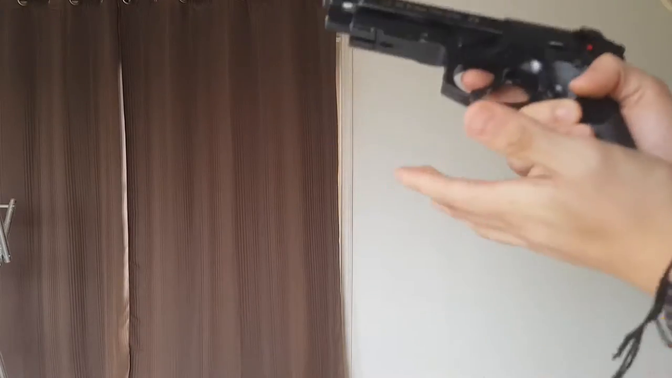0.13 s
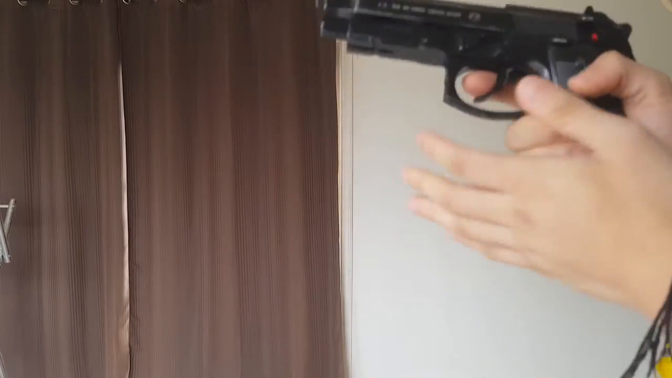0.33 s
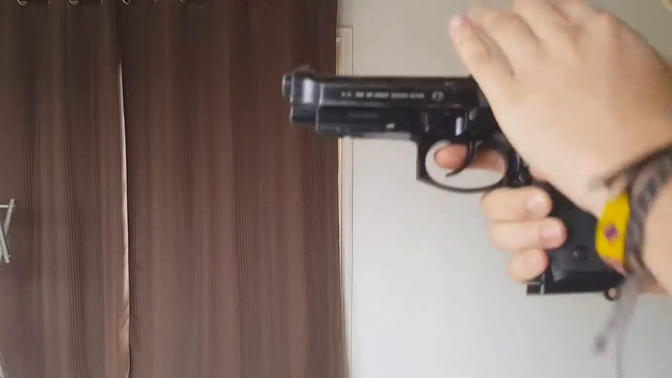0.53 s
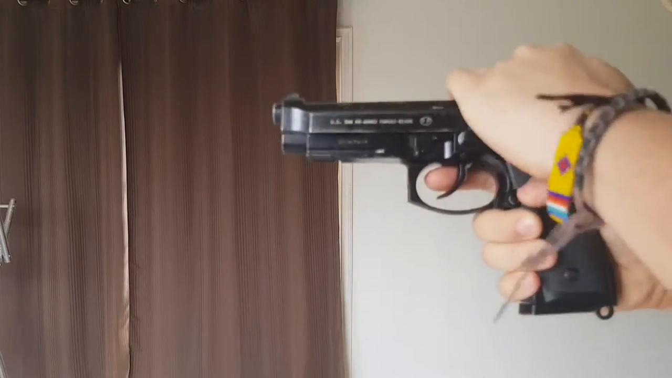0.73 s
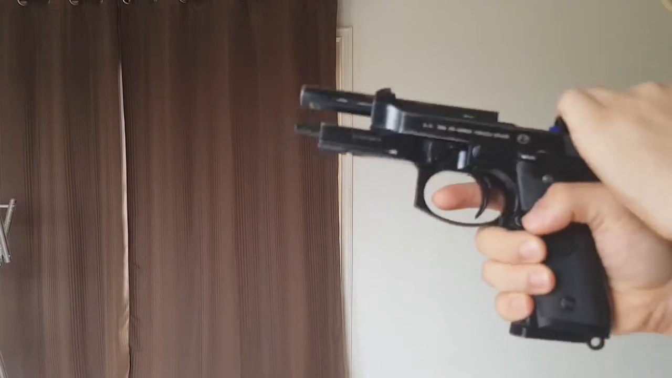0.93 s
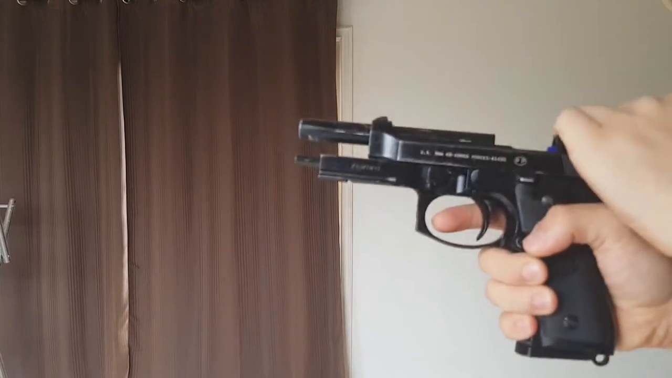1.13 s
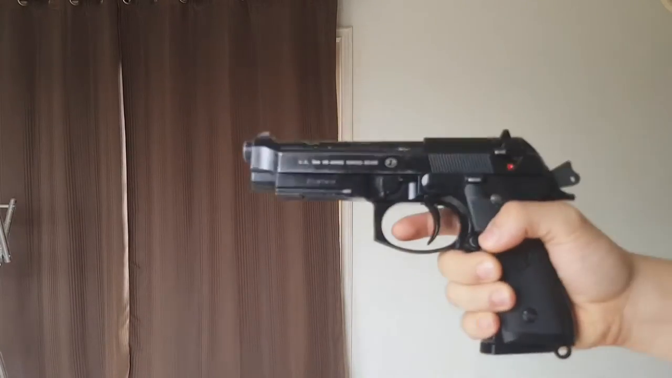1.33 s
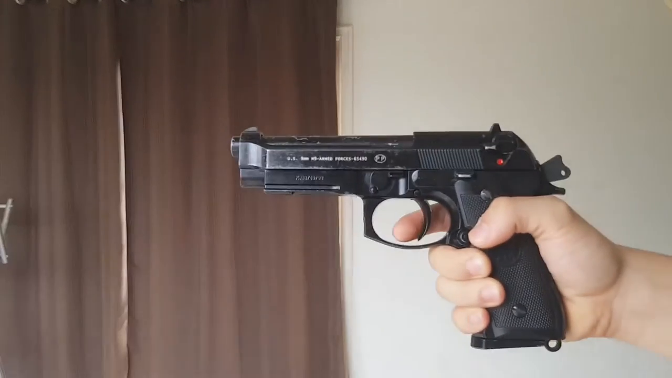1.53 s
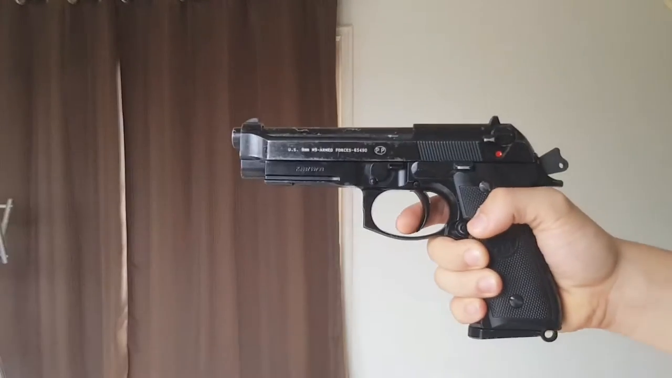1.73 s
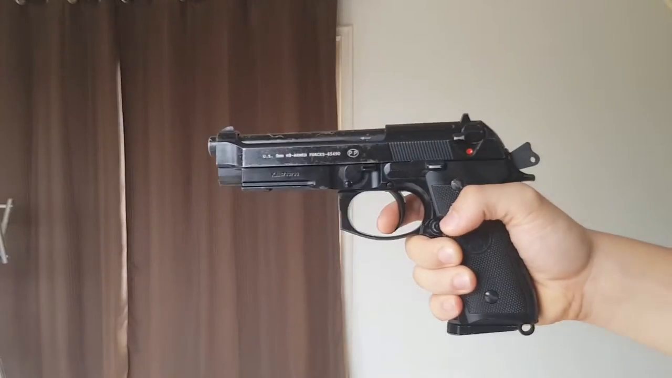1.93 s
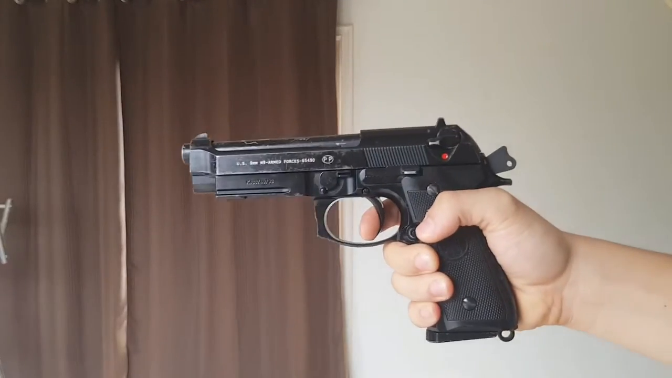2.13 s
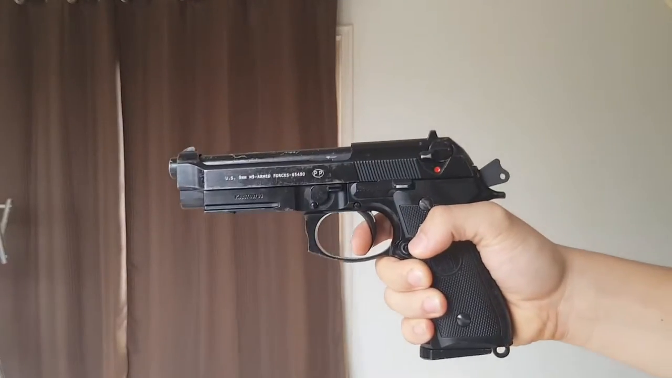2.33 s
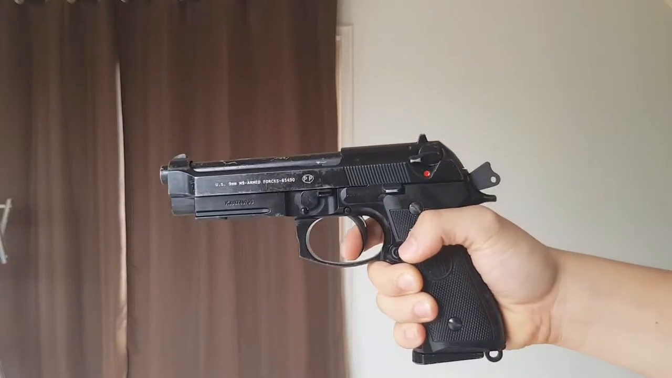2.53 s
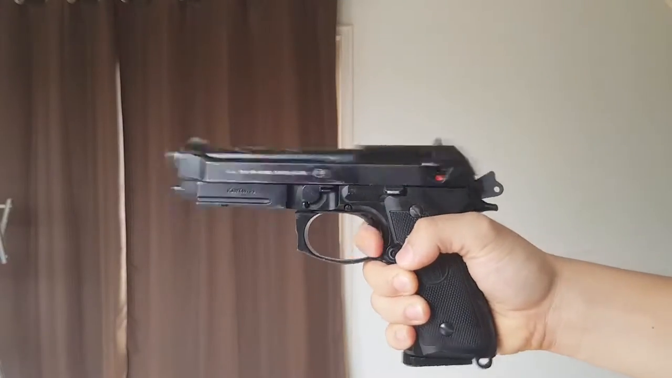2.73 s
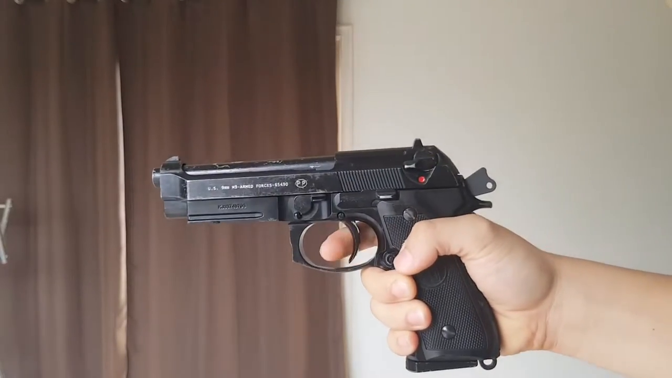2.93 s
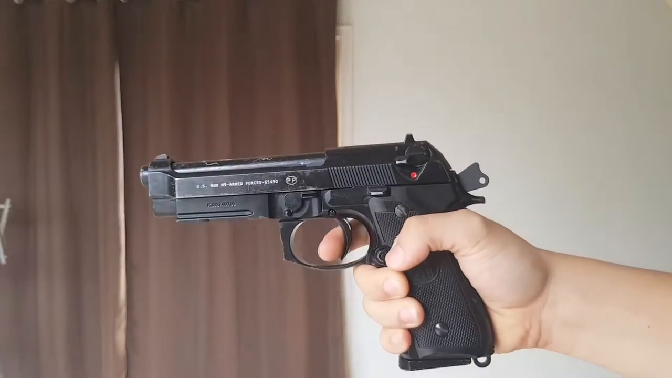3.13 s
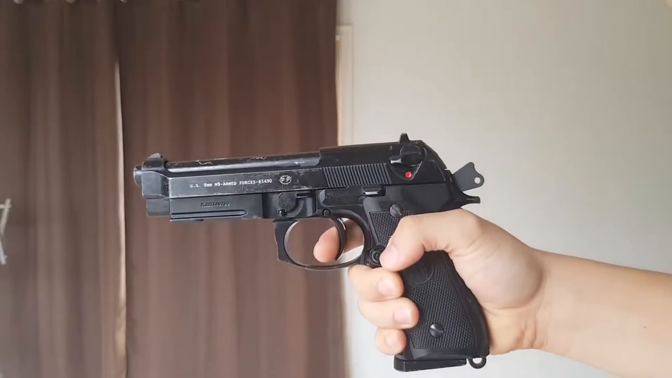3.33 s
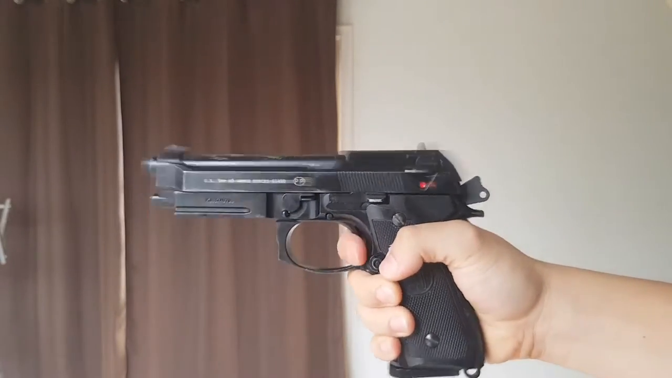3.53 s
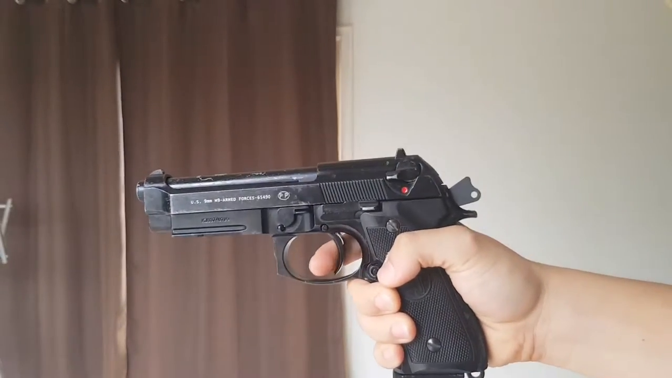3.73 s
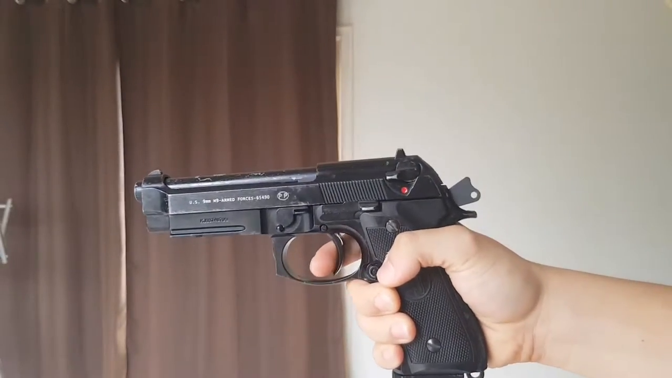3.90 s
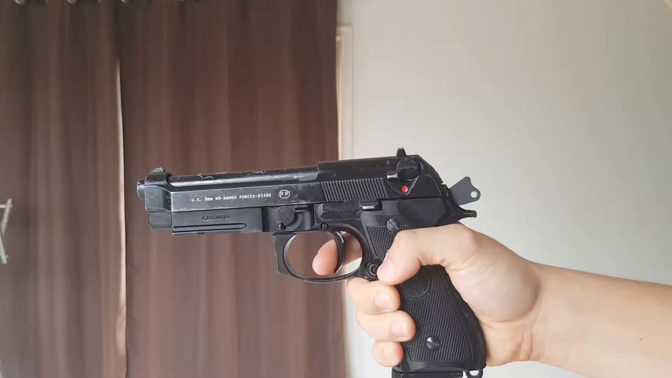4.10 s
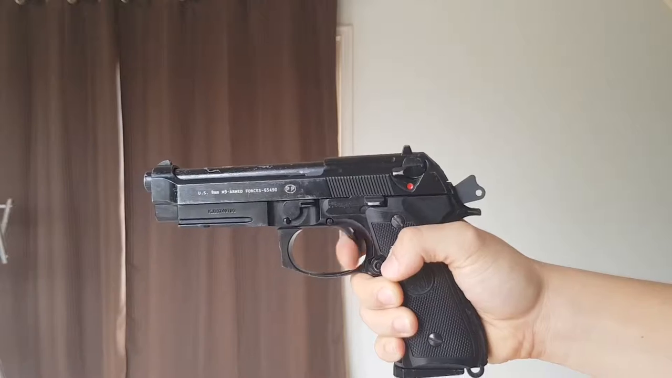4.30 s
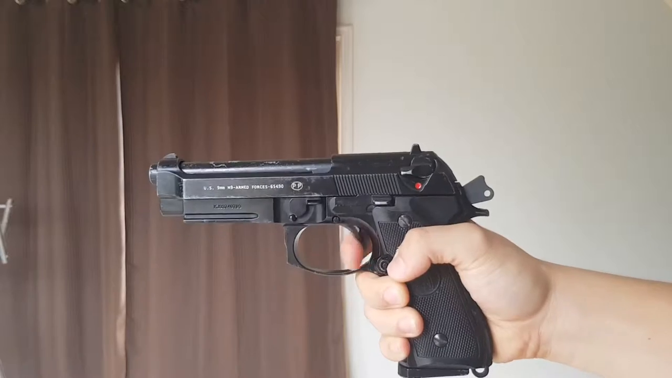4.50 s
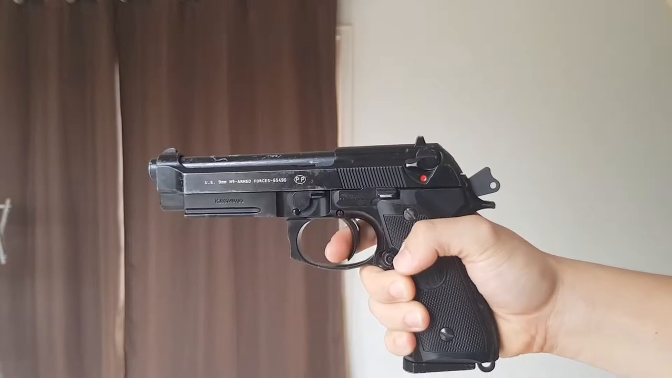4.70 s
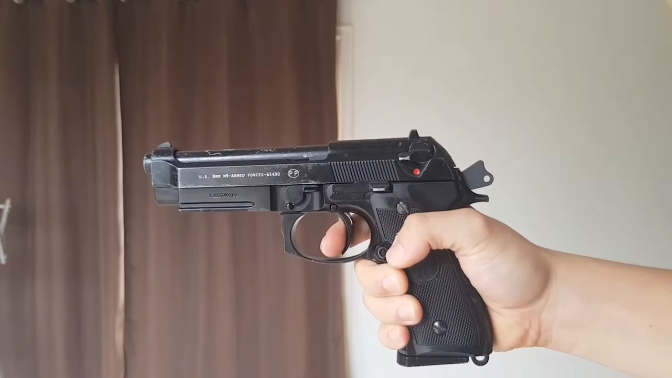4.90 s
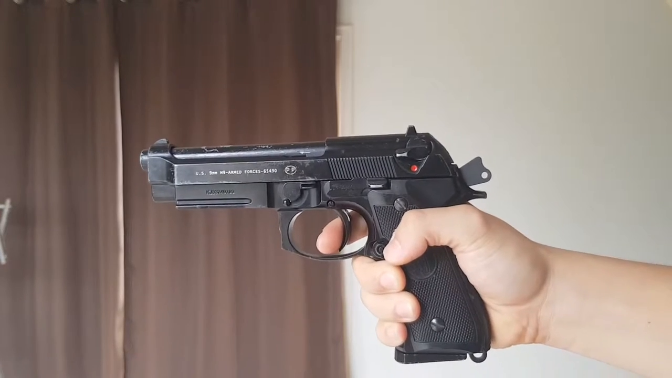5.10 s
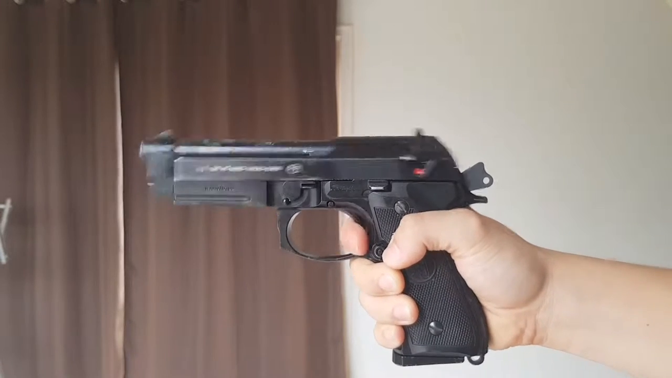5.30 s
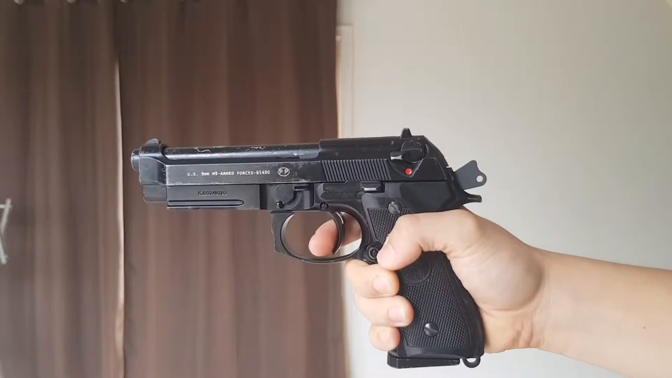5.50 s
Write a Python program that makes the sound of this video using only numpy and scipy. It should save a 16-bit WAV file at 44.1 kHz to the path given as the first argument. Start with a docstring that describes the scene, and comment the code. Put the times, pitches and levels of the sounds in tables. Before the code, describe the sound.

A fan hums low and steady in a small bare room. Right at the start, a magazine is slapped into a gas airsoft pistol close by, with a sharp double clack. From about 0.8 to 0.9 seconds the slide is drawn back with small clicks and a scrape, and at 1.3 seconds it slams shut with a bright metallic clack. A faint trigger click leads into four shots, at about 2.75, 3.55, 4.4 and 5.3 seconds. Each is a sharp gas pop merged with the slide clacking back and forth, a slight steel ring and a pellet smacking a target across the room, followed by a short echo. Puffs of air thump the microphone, mostly on the first three shots. A tiny ringing click comes near 3.3 seconds. The overall level drops at the first shot, leaving the hum fainter afterwards.

```python
"""A fan hums in a small bare room. A magazine is slapped into a gas airsoft pistol, then the slide
(the moving top) is pulled back and let go. Four shots follow, from 2.75 s on. In each, the hammer
knocks a valve open, gas pops out, the slide flies back and home, and the pellet smacks a target
across the room. The camera's gain control turns everything down at the first shot and keeps it low."""
import sys
import numpy as np
from scipy import signal
from scipy.fft import rfft, irfft, next_fast_len
from scipy.io import wavfile
from scipy.ndimage import uniform_filter1d, map_coordinates

SR = 44100
rng = np.random.default_rng(int(sys.argv[2]) if len(sys.argv) > 2 else 0)


def wrap_up_sound(samples):
    """Save the sound to the file named by the first command line argument, as 16-bit audio."""
    columns = np.atleast_2d(samples).T
    # keep every value between -1 and 1, then stretch to whole-number steps
    tamed = np.clip(columns, -1, 1)
    steps = np.round(tamed * 32767).astype(np.int16)
    wavfile.write(sys.argv[1], SR, steps)


N = 244755


def amp(db):
    """Turn decibels into a multiplier."""
    return 10 ** (np.asarray(db) / 20)

def unit(x):
    """Scale to an average power of one."""
    return x / np.sqrt(np.mean(x ** 2) + 1e-20)

def along(points, hz):
    """Read between (pitch, value) points on a log scale."""
    pitches, values = np.transpose(points)
    return np.interp(np.log(hz + 1), np.log(pitches + 1), values)

def add(track, s, sound):
    """Mix a sound into a track at s seconds."""
    part = track[..., max(0, round(s * SR)):][..., :sound.shape[-1]]
    part += sound[..., :part.shape[-1]]

def wobble(rate):
    """A smooth curve through `rate` random points a second."""
    return map_coordinates(rng.standard_normal(int(N * rate / SR) + 4), [np.arange(N) * rate / SR])

def filtered(x, response):
    """Scale each frequency in x by response(hz)."""
    n = x.shape[-1]
    padded = next_fast_len(n + n // 8)
    return irfft(rfft(x, padded) * response(np.fft.rfftfreq(padded, 1 / SR)), padded)[..., :n]

def coloured(x, tone, size=4096):
    """Give x a tone colour that would leave white noise just as strong."""
    gains = unit(amp(along(tone, np.fft.rfftfreq(size, 1 / SR))))
    cepstrum = irfft(np.log(gains))
    cepstrum[1:size // 2] *= 2
    cepstrum[size // 2 + 1:] = 0  # so nothing sounds before its hit
    return signal.fftconvolve(x, irfft(np.exp(rfft(cepstrum)))[None], axes=1)[:, :N]

def stereo_noise(likeness, count):
    """White noise whose left and right are alike (1), unrelated (0) or opposite (-1)."""
    def shares(hz):
        turn = np.arccos(np.clip(along(likeness, hz), -1, 1)) / 2
        return np.array([np.cos(turn), np.sin(turn)])
    mid, side = filtered(rng.standard_normal((2, count)), shares)
    return np.array([mid + side, mid - side])

# sound arriving from all sides: (pitch [Hz], left-right likeness [-1 to 1])
ALL_AROUND = [(60, 0.92), (130, 0.96), (290, .75), (640, 0.46), (1400, -0.51), (3000, 0.54), (7000, -0.15)]
# the fan motor's tones: (pitch [Hz], level [dB])
FAN_HUM = [(67, -53.5), (96, -55), (174.5, -47), (269, -68.5), (431, -78)]
# tone of the moving air: (pitch [Hz], level [dB])
FAN_AIR = [(20, -31.5), (40, -5.5), (65, -1), (100, 4), (140, 0), (190, -3), (250, -14.5), (400, -20),
           (700, -26), (1300, -29.5), (2500, -46.5), (4000, -59), (15000, -58)]
def fan(air_db=-47, waver_db=3.14):
    """A motor hums, a little unsteadily, over a low rush of air."""
    t = np.arange(N) / SR
    hum = 0
    for hz, db in FAN_HUM:
        strength = amp(db + waver_db * wobble(5.3))
        hum += strength * unit(np.sin(2 * np.pi * hz * t + 0.53 * wobble(2.9)))
    air = unit(filtered(stereo_noise(ALL_AROUND, N), lambda hz: amp(along(FAN_AIR, hz))))
    return hum + amp(air_db) * air

# the room's echo: (pitch [Hz], fade time [s]); a fade time, or t60, is the time to drop 60 dB
ROOM_FADE = [(60, 0.32), (130, 0.88), (400, 0.66), (1400, 0.74), (2700, 0.73), (5400, 0.6), (7700, 0.6),
             (11000, 0.47), (16000, 0.39)]
def room(x, gap_s=0.0014, build_s=0.00077, late_db=-24, late_stretch=2.26, count=6):
    """The walls answer after a short gap; highs fade before mids, and a faint echo lingers."""
    paths = np.array([wobble(100) for _ in range(count)])
    paths /= np.linalg.norm(paths, axis=0)  # each hit takes its own mix of paths round the room
    swell = 1 - np.exp(-np.maximum(np.arange(SR) / SR - gap_s, 0) / build_s)
    echo = np.zeros((2, N))
    for share in paths:
        hz, t, bands = signal.stft(stereo_noise(ALL_AROUND, SR), SR, nperseg=256)
        fall_db = -60 * t / along(ROOM_FADE, hz)[:, None]
        fade = np.hypot(amp(fall_db), amp(late_db + fall_db / late_stretch))
        tail = swell * signal.istft(bands * fade, SR, nperseg=256)[1][:, :SR]
        echo += signal.fftconvolve(share * x, tail / np.linalg.norm(tail[0]), axes=1)[:, :N]
    return echo

# air hitting the microphones: (time [s], left level [dB], right level [dB], length [s])
AIR_PUFFS = [(0.0, -34.5, -25.5, .03), (1.301, -35, -28, 0.025), (2.7532, 1.5, -1.5, 0.022),
             (3.555, 8.5, -31, .028), (4.4077, 4.5, -27, 0.016), (5.288, -20.5, -16.5, 0.015)]
def air_puffs(swing_hz=49, kick_turns=0.63, kick_s=0.0015):
    """A push of air kicks each microphone, which swings fast, then slows to a low thump."""
    thumps, t = np.zeros((2, N)), np.arange(SR // 4) / SR
    swing = np.sin(2 * np.pi * (swing_hz * t + kick_turns * (1 - np.exp(-t / kick_s))))
    for s, left_db, right_db, length in AIR_PUFFS:
        add(thumps, s, -amp([[left_db], [right_db]]) * swing * np.exp(-(t / length) ** 2))
    return thumps

# sound straight from the pistol: (pitch [Hz], left-right likeness [-1 to 1])
STRAIGHT = [(300, 1), (2000, 0.48), (6000, 0), (12000, 0)]
def burst(t60, rise_s=0.000062, count=8192):
    """One hit: noise that starts fast and dies away."""
    t = np.arange(count) / SR
    return stereo_noise(STRAIGHT, count) * amp(-60 * t / t60) * (1 - np.exp(-t / rise_s))

def rattle(t60, grain_db=3.0, grain_s=.0004, count=8192):
    """Loose parts chatter: a dying burst broken into tiny hits."""
    points = rng.standard_normal(count)
    grains = np.interp(np.arange(count) / SR / grain_s, np.arange(count), points)
    return burst(t60, count=count) * unit(amp(grain_db * grains))

# light touches on slide and trigger: (time [s], steel level [dB], fade time [s], frame level [dB])
CLICKS = [(.7935, -45.5, 0.0079, -51), (.8415, -40, 0.0076, -45.5), (.938, -43.5, 0.022, -32),
          (2.69, -38.5, 0.021, -49.5), (3.277, -37, 0.13, -57), (4.222, -61, 0.019, -46.5)]
# parts sliding under the hand: (start [s], end [s], steel level [dB], frame level [dB])
SCRAPES = [(0.814, 0.853, -54.5, -51.5), (0.864, .908, -35, -42.5), (1.256, 1.279, -53.5, -53.5),
           (2.706, 2.729, -56, -58.5)]
def light_touches(scatter_db=2, slip_t60=0.027, count=5):
    """List the clicks, and the uneven ticks of parts that catch and slip as they slide."""
    ticks = []
    for start, end, steel_db, frame_db in SCRAPES:
        times = start + (end - start) * (np.arange(count) + .5 * rng.random(count)) / count
        forces_db = scatter_db * rng.standard_normal(count)
        ticks += [(s, steel_db + db, slip_t60, frame_db + db) for s, db in zip(times, forces_db)]
    return CLICKS + ticks

# The magazine goes in and latches; the slide cocks the hammer, hits its stop, picks up a pellet
# and slams shut; the barrel settles:
# (time [s], steel level [dB], fade time [s], ring compared with steel [dB], frame level [dB])
LOADING_BLOWS = [(0.0, -13, 0.052, -35.5, -21), (.019, -14.5, 0.12, -27.5, -19.5),
                 (0.8601, -18.5, .011, -29.5, -35.5), (0.9149, -18, .02, -36.5, -27),
                 (1.281, -20.5, 0.06, -32, -43), (1.2956, -10, 0.058, -25, -21),
                 (1.3152, -14.5, 0.036, -27, -29)]
def loading_hits(bounce_share=.15, bounce_db=-1.5):
    """List the hits of loading: each part strikes and bounces once, the looser the later."""
    hits = []
    for s, db, t60, ring_db, _ in LOADING_BLOWS:
        hits += [(s, db, t60, ring_db), (s + bounce_share * t60, db + bounce_db, t60, ring_db)]
    return hits

# tone of the plastic frame: (pitch [Hz], level [dB])
FRAME_TONE = [(150, -19), (400, -8.5), (560, -3), (780, -6.5), (1050, 1), (1500, -3), (2250, 6), (3200, -4),
              (8000, -16), (15000, -30.5)]
def frame_knocks(touches, knock_t60=0.02):
    """The plastic frame answers each loading blow and light touch with a short, dull knock."""
    knocks = np.zeros((2, N))
    for s, *_, db in LOADING_BLOWS + touches:
        add(knocks, s, amp(db) * burst(knock_t60))
    return coloured(knocks, FRAME_TONE)

# the four shots: (time [s], shot level [dB], pellet level [dB], closing slide level [dB])
SHOTS = [(2.7532, 2, 2.5, 3), (3.5565, -0.5, 0.5, -2.5), (4.408, 1.5, 0, -6), (5.279, 2.5, 0.5, -5)]
# The hammer's catch slips; it comes free, swings and opens the valve; gas throws the slide back:
# (time after the valve opens [s], level compared with the shot [dB], fade time [s])
FIRING_STEPS = [(-.0285, -41.5, .018), (-.0142, -29, 0.054), (-.003, -13, 0.023), (0, 0.5, .028),
                (.016, -2.5, 0.12)]
def firing_hits(ring_db=-37, home_s=0.05, home_t60=0.084):
    """List the hits of firing: every shot runs the same steps, then a spring shuts the slide."""
    steps = [(s + delay, db + step_db, t60, ring_db)
             for s, db, *_ in SHOTS for delay, step_db, t60 in FIRING_STEPS]
    return steps + [(s + home_s, home_db, home_t60, ring_db) for s, _, _, home_db in SHOTS]

# ringing notes of slide and barrel: (pitch [Hz], level [dB], fade time [s])
STEEL_NOTES = [(2050, -11, 0.18), (2430, -3, 0.24), (2614, 1, 0.39), (2910, 0, 0.18), (4710, -1, 0.35),
               (5510, -3.5, .2), (7400, -1.5, 0.19), (9000, -4, .15), (11350, 0.5, .15), (11900, -1, .15),
               (14900, -5, .12)]
# tone of a steel clack: (pitch [Hz], level [dB])
STEEL_TONE = [(100, -19), (400, -19), (750, -18), (1050, -6), (1400, -7.5), (2000, -1.5), (2700, 0.5),
              (3500, -0.5), (4600, 1.5), (6500, 1), (9000, 0), (12000, 3.5), (14000, -1.5), (15000, -2)]
def steel_clacks(touches, touch_ring_db=-32):
    """Every steel hit clacks and rings the slide and barrel with a new mix of their notes."""
    hits = loading_hits() + firing_hits() + [(s, db, t60, touch_ring_db) for s, db, t60, _ in touches]
    clacks, rings, t = np.zeros((2, N)), np.zeros((2, N)), np.arange(SR // 2) / SR
    hz, note_db, note_t60 = np.transpose(STEEL_NOTES)[:, :, None]
    notes = amp(note_db - 60 * t / note_t60) * np.sin(2 * np.pi * hz * t)
    for s, db, t60, ring_db in hits:
        add(clacks, s, amp(db) * rattle(t60))
        add(rings, s, amp(db + ring_db) * rng.standard_normal((2, len(notes))) @ notes)
    return coloured(clacks, STEEL_TONE) + rings

# tone of the struck target: (pitch [Hz], level [dB])
TARGET_TONE = [(100, -26), (350, -1.5), (600, -3.5), (1000, -4), (1350, -2.5), (2050, -0.5), (3000, -6),
               (6000, -16), (15000, -21.5)]
def pellet_smacks(flight_s=.051, smack_t60=0.026):
    """Each pellet flies across the room and smacks a target."""
    smacks = np.zeros((2, N))
    for s, _, db, _ in SHOTS:
        add(smacks, s + flight_s, amp(db) * burst(smack_t60))
    return coloured(smacks, TARGET_TONE)

# tone of the gas pop: (pitch [Hz], level [dB])
GAS_TONE = [(40, -22), (90, -17), (160, 3), (260, -0.5), (450, -5), (700, -0.5), (1100, -1), (1650, -3.5),
            (3000, -7.5), (4500, -3.5), (7000, -9), (12000, -4), (15000, -7.5)]
def gas_pops(barrel_s=.0062, bounce_s=.00195, shock_db=19, jet_db=-4, jet_t60=0.032):
    """Gas pops at the valve, then leaves the barrel as a sharp shock, its bounce and a short hiss."""
    pops = np.zeros((2, N))
    for s, db, *_ in SHOTS:
        shock = amp(db + shock_db) * np.ones((2, 1))
        add(pops, s, amp(-5) * shock)  # at the valve
        add(pops, s + barrel_s, shock)
        add(pops, s + barrel_s + bounce_s, amp(-5) * shock)
        add(pops, s + barrel_s, amp(db + jet_db) * burst(jet_t60))
    return coloured(pops, GAS_TONE)

def scene(pop_db=3, beam_hz=3000, pellet_db=-6, gun_room_db=-3.5, pop_room_db=6.0, pellet_room_db=4):
    """The pistol's parts are close by; pops and pellets are heard mostly by way of the walls."""
    touches = light_touches()
    gun = steel_clacks(touches) + frame_knocks(touches)
    pops, smacks = gas_pops(), pellet_smacks()
    side_pops = filtered(pops, lambda hz: 1 / (1 + 1j * hz / beam_hz))  # the barrel aims highs forward
    near = gun + amp(pop_db) * side_pops + amp(pellet_db) * smacks
    walls = room(amp(gun_room_db) * gun + amp(pop_room_db) * pops + amp(pellet_room_db) * smacks)
    return near + walls + air_puffs() + fan()

def gain_control(x, limit_db=-18.5, recover_db_per_s=0.17, window_s=.014):
    """Loud mid-range sound turns the volume down at once; it creeps back very slowly."""
    mids = filtered(x, lambda hz: (hz > 250) & (hz < 3000))
    power = np.abs(uniform_filter1d(np.mean(mids ** 2, axis=0), int(window_s * SR)))
    excess_db = np.maximum(10 * np.log10(power + 1e-12) - limit_db, 0)
    creep_db = recover_db_per_s * np.arange(N) / SR
    return x * amp(creep_db - np.maximum.accumulate(excess_db + creep_db))

def record(dry, low_hz=27, top_hz=15600):
    """The camera drops deep rumble, turns loud sound down, flattens peaks and cuts the top highs."""
    heard = filtered(dry, lambda hz: 1j * hz / (low_hz + 1j * hz))
    flattened = np.clip(gain_control(heard), -1, 1)
    return filtered(flattened, lambda hz: 1 / np.sqrt(1 + (hz / top_hz) ** 160))


dry = scene()
out = record(dry)
wrap_up_sound(out)
```